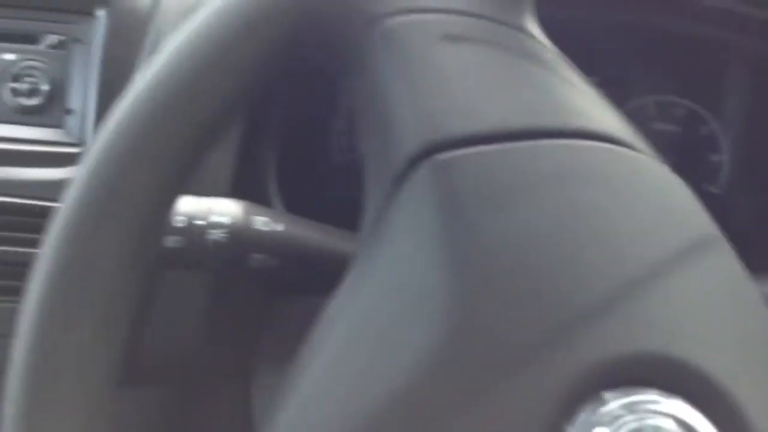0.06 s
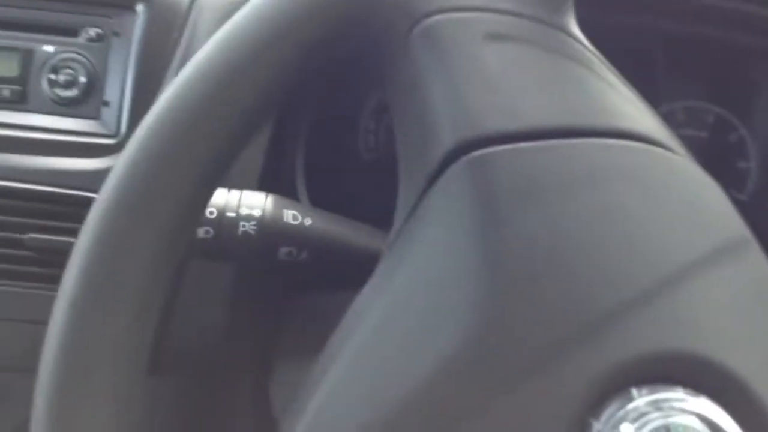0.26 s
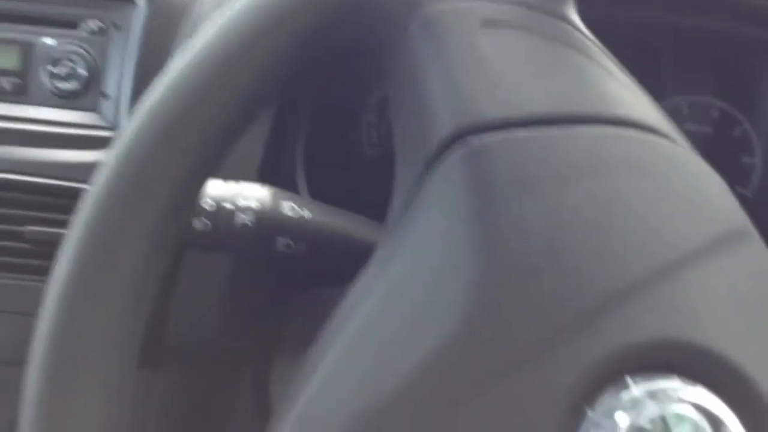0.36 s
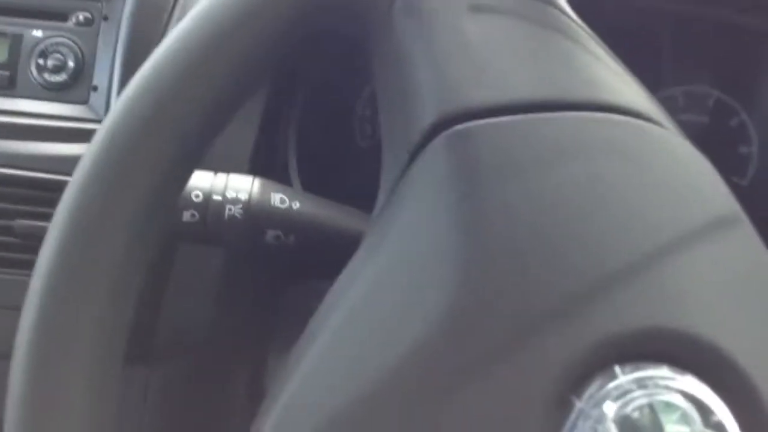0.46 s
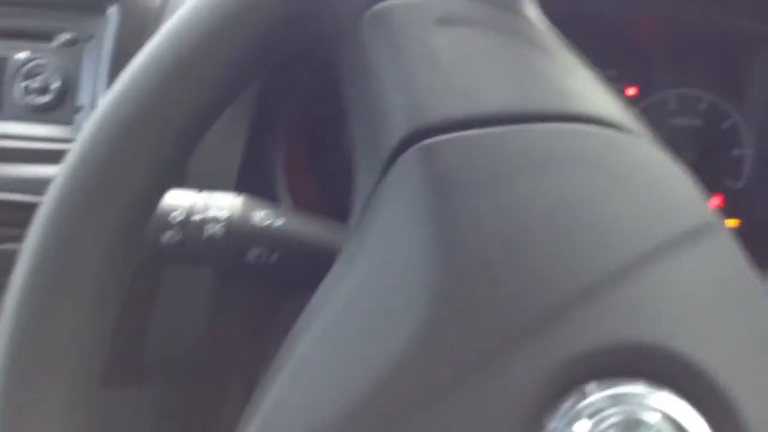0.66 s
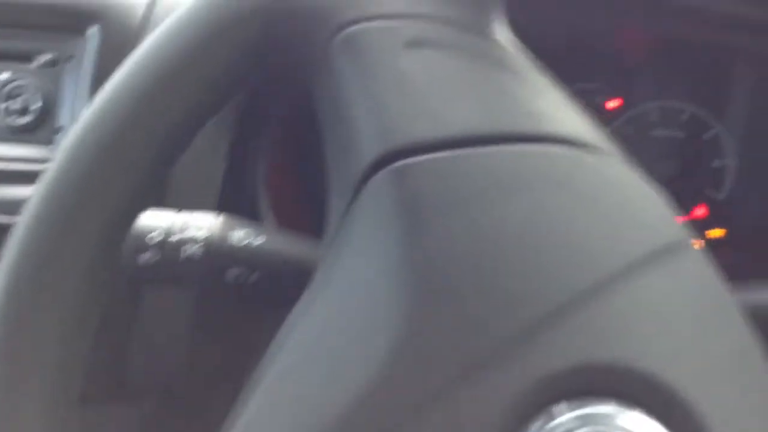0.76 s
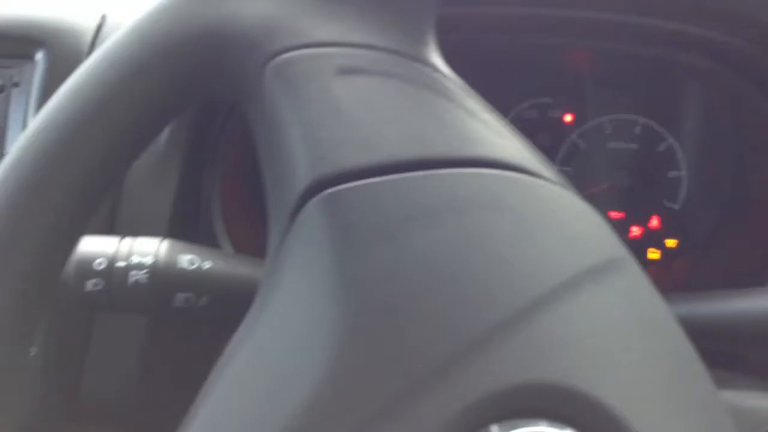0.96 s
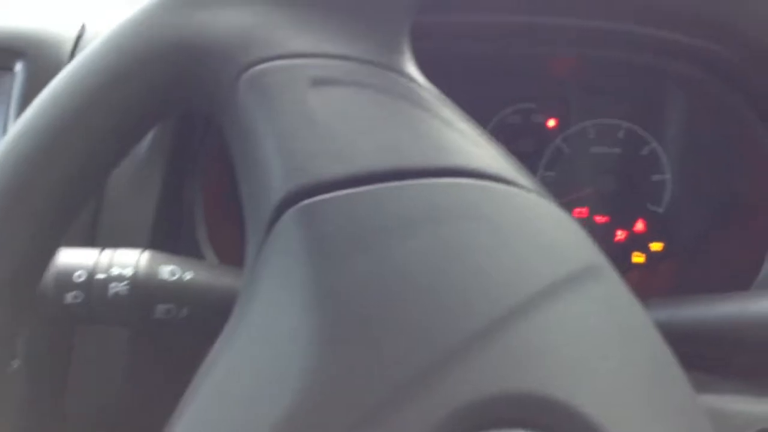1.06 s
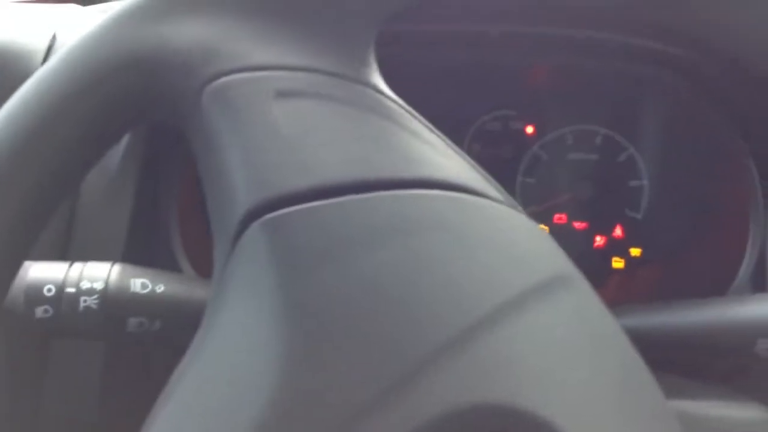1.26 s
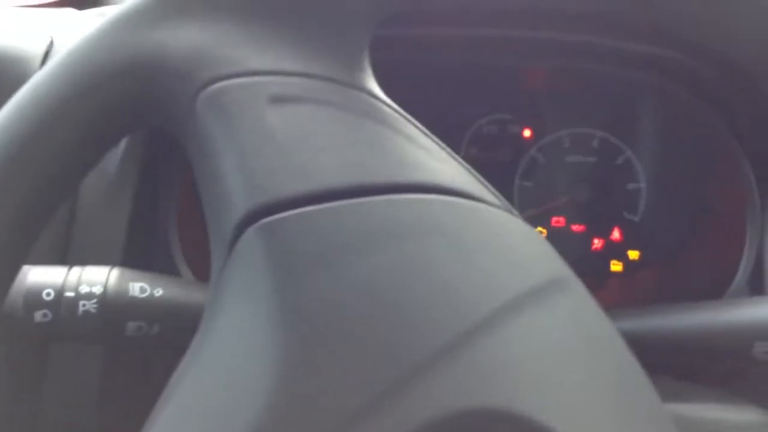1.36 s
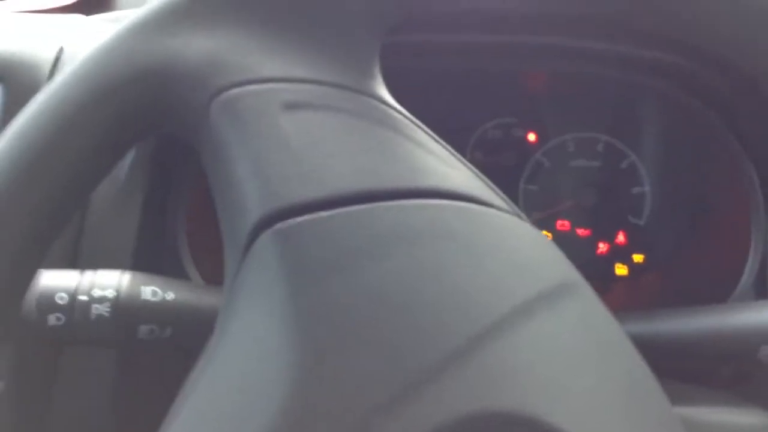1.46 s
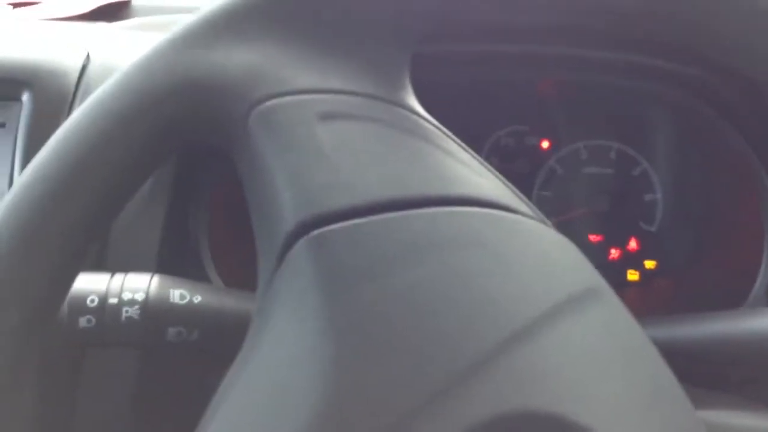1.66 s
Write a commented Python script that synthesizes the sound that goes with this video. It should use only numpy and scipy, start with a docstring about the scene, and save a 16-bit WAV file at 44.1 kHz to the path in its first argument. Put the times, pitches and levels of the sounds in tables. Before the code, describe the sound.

A key turns in a van's ignition lock with rattling clicks and one loud snap, then hums

```python
"""Inside a parked van, close to the steering column: a key turns in the ignition lock in short rattling clicks,
with one loud snap; dull thuds follow behind the dash, a small pump starts to hum, keys tick and rub once more.
Gritty noise rings modes of lock housing, keys and trim; soft pushes ring the dash; the hum is a stack of
harmonics. The cabin adds a short dull ring of decaying noise, over a quiet floor of shaped noise."""
import sys
import numpy as np
from scipy import signal
from scipy.fft import rfft, irfft
from scipy.io import wavfile
from scipy.ndimage import uniform_filter1d

SR = 44100
rng = np.random.default_rng(int(sys.argv[2]) if len(sys.argv) > 2 else 0)


def gain_from_db(level_db):
    """Turn a decibel level (scalar or array-like) into a linear amplitude factor."""
    decades = np.asarray(level_db, float) / 20
    return 10 ** decades


def output_pcm(signal):
    """Save a mono or channel-first signal as 16-bit PCM at the path in sys.argv[1].

    Samples are clipped to [-1, 1] before scaling.
    """
    pcm = np.clip(np.atleast_2d(signal).T, -1, 1) * 32767
    wavfile.write(sys.argv[1], SR, np.round(pcm).astype(np.int16))


N = 74970  # samples, 1.7 s


def colour(x, points):
    """Shape the spectrum of x by (f/Hz, level/dB) points, joined by straight lines over log frequency."""
    hz, db = np.array(points, float).T
    f = np.maximum(np.fft.rfftfreq(len(x), 1 / SR), 1)
    gain = gain_from_db(np.interp(np.log(f), np.log(hz), db))
    return irfft(rfft(x) * gain, len(x))


def unit(x, seconds):
    """Scale x so that its first seconds have rms 1."""
    start = x[:int(seconds * SR) + 1]
    return x / np.sqrt(np.mean(start ** 2) + 1e-18)


def band(x, edges_hz):
    """Steep band-pass."""
    return signal.sosfilt(signal.butter(3, edges_hz, "band", fs=SR, output="sos"), x)


def ring(x, modes):
    """Excite decaying sine modes with x; every blow weights them a little differently."""
    scatter_db = 2.5 * rng.standard_normal(len(modes))
    out = 0
    for (hz, db, t60), extra_db in zip(modes, scatter_db):
        pole = np.exp(2j * np.pi * hz / SR - np.log(1000) / (t60 * SR))
        mode = signal.lfilter([1], [1, -pole], x).imag
        out = out + gain_from_db(db + extra_db) / np.sqrt(t60) * mode
    return out


def add(track, t, x):
    """Mix x into track at time t/s."""
    i = max(int(t * SR), 0)
    track[i:i + len(x)] += x[:N - i]


def walk(rate):
    """Slow random curve: values held for 1 / rate seconds, then smoothed twice."""
    hold = int(SR / rate)
    steps = np.repeat(rng.standard_normal(N // hold + 1), hold)
    return 1.3 * uniform_filter1d(uniform_filter1d(steps, hold), hold)[:N]


# Spectral shape of the cabin murmur and hiss: f/Hz, relative level/dB per Hz
MURMUR_SHAPE = [(35, -38), (60, -9), (115, 0), (142, -6.5), (188, -2), (285, -4.5), (377, -8), (424, -9),
                (573, -7.5), (832, -15.5), (1000, -9.5), (1320, -5), (1520, -17), (1790, -12),
                (2660, -20.5), (13600, -25), (15600, -33)]
# Swell of the floor below 3200 Hz over its resting level: t/s, level/dB
MURMUR_SWELL = [(0, 9), (.2, 5), (.45, 3.5), (0.699, 2.5), (1, 1), (1.3, 0.5), (1.5, 0.5), (1.7, 4)]
FLOOR_DB = -59  # resting rms


def floor():
    """Cabin murmur: shaped noise whose lows and mids swell and settle, with steady hiss on top."""
    noise = unit(colour(rng.standard_normal(N), MURMUR_SHAPE), N / SR)
    swell_db = np.interp(np.arange(N) / SR, *np.array(MURMUR_SWELL, float).T)
    f, spectrum = np.fft.rfftfreq(N, 1 / SR), rfft(noise)
    murmur = irfft(spectrum * (f < 3200), N)
    hiss = irfft(spectrum * (f >= 3200), N)
    return gain_from_db(FLOOR_DB) * (gain_from_db(swell_db) * murmur + hiss)


# Harmonics of the pump: multiple of the fundamental, rms level/dB before wavering
PUMP_HARMONICS = [(1, -62.5), (2, -66), (3, -74), (4, -79.5), (5, -88)]
HUM_HZ, HUM_WAVER = 142.4, 0.0057  # fundamental, pitch waver as a fraction of it
HUM_START_S, HUM_RISE_S = 0.596, 0.19


def hum():
    """A small pump fades in and holds a slightly wavering note, each harmonic wavering in level by itself."""
    t = np.arange(N) / SR
    pitch_hz = HUM_HZ * (1 + HUM_WAVER * walk(6.47))
    phase = 2 * np.pi * np.cumsum(pitch_hz) / SR
    tones = 0
    for k, db in PUMP_HARMONICS:
        level = gain_from_db(db + 1.6 * walk(7.7)) * np.sqrt(2)
        tones = tones + level * np.sin(k * phase + k * k)  # k * k spreads the starting phases
    return tones * np.clip((t - HUM_START_S) / HUM_RISE_S, 0, 1)


# Low modes of the dash: f/Hz, relative level/dB, t60/s
DASH_MODES = [(119, 2, 0.21), (149, -1.5, 0.17), (234, -2.5, 0.087), (309.2, 6, 0.1), (342, -1.5, 0.041),
              (444.5, 1.5, 0.11), (471, 1.5, 0.12), (516.3, 0, 0.091), (722, -8, 0.11), (1285, 6, 0.052)]
# Dull thuds behind the dash: t/s, peak level/dB, push length/s
DASH_THUDS = [(.482, -35.5, 0.00067), (.490, -34.5, 0.0021), (.512, -42, 0.00095), (.530, -50, 0.00074),
              (.548, -52.5, 0.0017), (.572, -48, 0.0014), (.600, -39.5, 0.0026), (.612, -40.5, 0.0014),
              (.640, -47.5, .0015), (.655, -44.5, 0.00053), (.680, -51.5, 0.0032), (.705, -57, 0.00094),
              (.730, -45.5, 0.0016), (.757, -71, 0.0017)]


def thuds():
    """Soft half-sine pushes, each followed by dying noise that stirs the dash, ring its low modes."""
    out, t = np.zeros(N), np.arange(16384) / SR
    for s, db, length in DASH_THUDS:
        push = np.sin(np.pi * np.clip(t / length, 0, 1))
        stir = 2.0 * rng.standard_normal(len(t)) * np.exp(-t / 0.033) * (t > length)
        body = band(ring(push + stir, DASH_MODES), (130, 800))
        add(out, s, gain_from_db(db) * body / abs(body).max())
    return out


# Modes of lock housing, keys and trim panel: f/Hz, relative level/dB, t60/s
HOUSING_MODES = [(1052, -17, 0.074), (1116, -8, 0.09), (1320, 1.5, 0.028), (1397, 12, 0.09),
                 (1670, -15, 0.058), (1882, 11.5, 0.043), (1960, 6, .03), (1990, 7.5, 0.014),
                 (2164, 18, 0.0083), (2393, 4, 0.023), (2784, 5, 0.027)]
METAL_MODES = [(3460, -22, 0.042), (4126, 1, 0.031), (4524, 0, 0.0067), (4800, 3, 0.056),
               (5320, 4.5, 0.0067), (6600, -12, 0.005), (8280, -2.5, .015), (9920, -6.5, 0.0069),
               (11290, -4.5, 0.0051)]
PANEL_MODES = [(297, -5.5, 0.18), (391, 3.5, 0.0444), (494, 5, 0.088), (635, 3, 0.045), (680, 13, 0.013)]
# Unpitched part of the housing and of the keys: f/Hz, relative level/dB per Hz
HOUSING_NOISE = [(500, -58.5), (900, -17.5), (1250, 8), (1550, -1), (1900, 1.5), (2500, -10), (3500, -23)]
METAL_NOISE = [(1470, -13), (2500, -3), (4800, -5), (5870, 1), (10900, -8), (15300, -10.5), (16000, -39)]
HOUSING_NOISE_DB, METAL_NOISE_DB = -5, 3  # over the rms of the modes
GRIT_DB, GRIT_S, GRAIN_DB = 2, .0008, 2.5  # roughness of the envelope, its grain length, spikiness of the noise


def contact(shape, metal_shape, seconds, tilt_db, housing_tilt_db=0, panel_tilt_db=0):
    """Gritty contacts under an envelope ring housing, keys and panel, each to rms 1; tilts in dB per octave."""
    noise = rng.standard_normal((4, len(shape)))
    k = int(GRIT_S * SR)
    grit = gain_from_db(GRIT_DB * np.sqrt(k) * uniform_filter1d(noise[3], k))
    grains = gain_from_db(GRAIN_DB * rng.exponential(size=(3, len(shape))))
    a, b, c = noise[:3] * grains
    a = colour(a, [(800, -housing_tilt_db), (3200, housing_tilt_db)])
    b = colour(b, [(4000, 0), (16000, 2 * tilt_db)])
    c = colour(c, [(225, -panel_tilt_db), (900, panel_tilt_db)])
    shape, metal_shape = shape * grit, metal_shape * grit

    housing = unit(ring(shape * a, HOUSING_MODES), seconds)
    housing = housing + gain_from_db(HOUSING_NOISE_DB) * unit(shape * colour(a, HOUSING_NOISE), seconds)
    metal = unit(ring(metal_shape * b, METAL_MODES), seconds)
    metal = metal + gain_from_db(METAL_NOISE_DB) * unit(metal_shape * colour(b, METAL_NOISE), seconds)
    panel = ring(shape * c, PANEL_MODES)

    parts = (housing, (800, 3200)), (metal, (2600, 15800)), (panel, (220, 900))
    return [unit(band(x, edges_hz), seconds) for x, edges_hz in parts]


# Keys sliding on the ring and trim: t/s, length/s, metal tilt/dB per octave,
# then rms level/dB of housing, metal, panel
KEY_RUBS = [(0, 0.059, 0.5, -53, -63.5, -54), (0.059, .035, -7, -59, -68, -58),
            (.115, 0.027, 1, -56, -64, -51), (0.256, 0.1, -4, -66, -80, -68),
            (1.331, 0.059, 6, -58, -64.5, -67), (1.428, 0.04, 2.5, -53, -53, -57.5),
            (1.476, 0.032, 3.5, -75, -64.5, -76), (1.604, 0.039, -2, -56, -59.5, -66),
            (1.646, 0.047, 2.5, -57.5, -57, -73)]


def rubs():
    """The same three parts as the clicks under a sliding contact that swells, holds and fades."""
    out, t = np.zeros(N), np.arange(8192) / SR
    for s, length, tilt_db, *levels_db in KEY_RUBS:
        shape = np.clip(t / 0.0043, 0, 1) * gain_from_db(-60 * np.maximum(t - length, 0) / 0.034)
        parts = contact(shape, shape, length, tilt_db)
        add(out, s, sum(gain_from_db(db) * part for db, part in zip(levels_db, parts)))
    return out


# Clicks of key and lock, each a short rattle: t/s, housing peak level/dB, metal rms level/dB,
# panel rms level/dB, rattle length/s, metal tilt/dB per octave, housing tilt/dB per octave
LOCK_CLICKS = [(.003, -43.5, -55.5, -51, 0.0031, 0, -1), (.020, -60, -63, -59, 0.0094, 3, -9.5),
               (.054, -28, -51.5, -43, 0.007, -9.5, -5), (0.1054, -32.5, -56.5, -61, 0.003, -9, 0),
               (.113, -41, -64, -53, 0.0099, -5, -9), (0.1343, -32.5, -51, -46, 0.0076, -4, -3.5),
               (0.18, -57, -60.5, -57, 0.0037, 4, 5), (0.199, -18, -35, -43, 0.011, -9.5, 14.5),
               (.212, -18.5, -28, -37.5, 0.012, 0, 0), (.219, -12, -26, -39.5, .004, -12.5, 9),
               (.224, -9.5, -34.5, -43.5, 0.002, -1, -1), (.232, -13.5, -43, -40.5, 0.0038, 10.5, 0),
               (.249, -36, -45.5, -47.5, 0.0027, 0.5, -7), (.267, -35.5, -54, -52, 0.0075, -9, 14),
               (.306, -58, -68, -58, 0.0027, -3, -3), (.318, -53.5, -75, -51.5, 0.0037, -3, 5),
               (.380, -37, -65, -47, 0.011, -9, 4), (0.435, -49.5, -70, -70, 0.0032, -3, 0),
               (.500, -48, -73, -52, 0.0076, -1, 0), (.610, -66, -62, -57, 0.0029, 1, 3),
               (.644, -46.5, -60.5, -65, 0.0075, 0, 5.5), (.656, -55, -60.5, -65, 0.0029, 8, 1),
               (.793, -55, -74, -78, .006, -3, -1), (1.327, -51.5, -64.5, -69, 0.0045, -1, -11),
               (1.364, -40, -40.5, -63, 0.0099, 6, 8), (1.415, -43.5, -57, -66, 0.011, 8, 4),
               (1.4417, -37, -69, -53, .004, 10, 10.5), (1.558, -51, -67, -61.5, 0.013, 2, 0),
               (1.621, -51, -62, -65.5, 0.0036, 0, 18), (1.662, -50, -55, -75, 0.006, 2.5, 9)]
RATTLE_T60_S, METAL_T60_S = 0.034, 0.044  # dying away of the contact after the rattle
STRIKE_DB, STRIKE_S = 5.5, .001  # extra level at the onset, its time constant
DEEP_BLOW_DB, PANEL_TILT_PER_DB = -19.5, 0.17  # lighter blows reach the low panel modes less (dB/octave per dB)


def clicks():
    """Sudden strike, a short rattle, then a quick dying away, a little slower in the keys."""
    out, t = np.zeros(N), np.arange(8192) / SR
    for s, housing_db, metal_db, panel_db, length, *tilts_db in LOCK_CLICKS:
        after = np.maximum(t - length, 0)
        strike_db = STRIKE_DB * np.exp(-t / STRIKE_S)
        shape = gain_from_db(strike_db - 60 * after / RATTLE_T60_S)
        metal_shape = gain_from_db(strike_db - 60 * after / METAL_T60_S)
        panel_tilt_db = PANEL_TILT_PER_DB * (DEEP_BLOW_DB - housing_db)
        housing, metal, panel = contact(shape, metal_shape, .015, *tilts_db, panel_tilt_db)
        click = gain_from_db(housing_db) * housing / abs(housing).max()
        add(out, s, click + gain_from_db(metal_db) * metal + gain_from_db(panel_db) * panel)
    return out


CABIN_DB, CABIN_T60_S, CABIN_HZ = -17, 0.11, 3960  # ring level, decay, low-pass corner


def cabin(near):
    """Short dull ring of the cabin: the sound convolved with dying low-passed noise of unit energy."""
    t = np.arange(8192) / SR
    tail = rng.standard_normal(len(t)) * gain_from_db(-60 * t / CABIN_T60_S) * (t > .003)
    tail = signal.lfilter(*signal.butter(1, CABIN_HZ, fs=SR), tail)
    wet = signal.fftconvolve(near, tail / np.sqrt(np.sum(tail ** 2)))[:N]
    return gain_from_db(CABIN_DB) * wet


def scene():
    """Floor and pump, with the key, lock and dash sounds ringing in the cabin."""
    near = clicks() + rubs() + thuds()
    return (near + cabin(near) + hum() + floor())[None]


def low_pass(x):
    """Removes everything above the highest recorded frequency."""
    return signal.sosfilt(signal.butter(12, 16630, fs=SR, output="sos"), x)


def record(dry):
    """The microphone drops the deep bass below 98 Hz."""
    mix = signal.sosfilt(signal.butter(3, 98, "high", fs=SR, output="sos"), dry)
    return low_pass(mix)


dry = scene()
out = record(dry)
output_pcm(out)
```